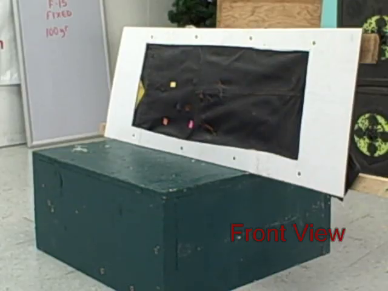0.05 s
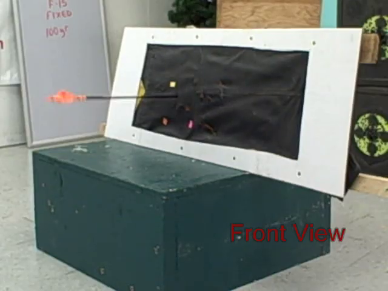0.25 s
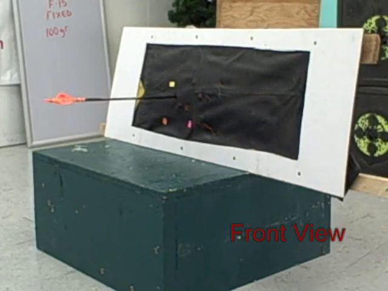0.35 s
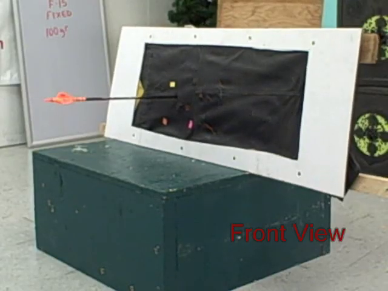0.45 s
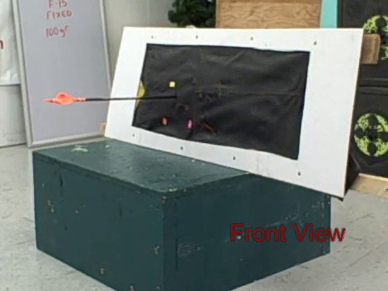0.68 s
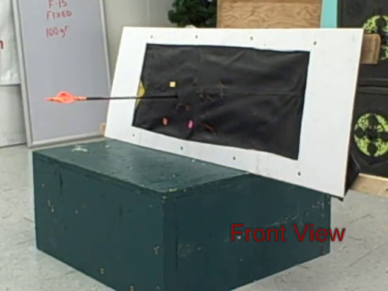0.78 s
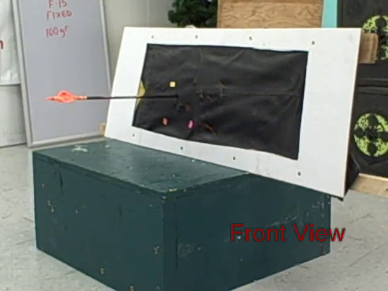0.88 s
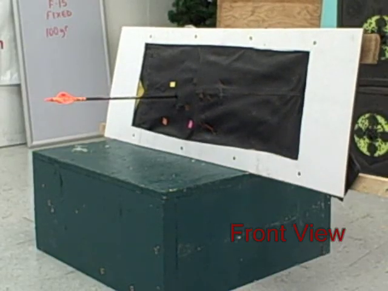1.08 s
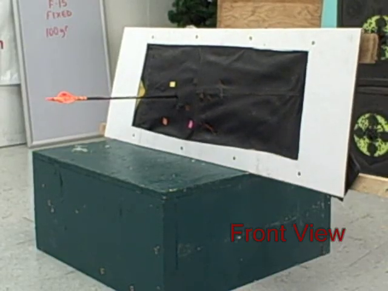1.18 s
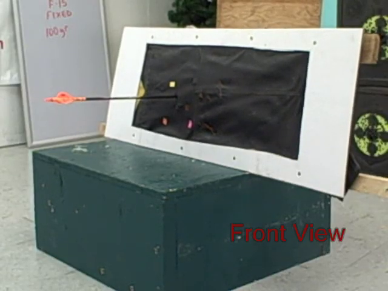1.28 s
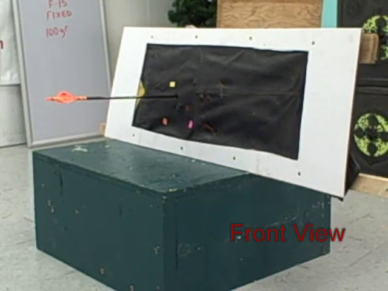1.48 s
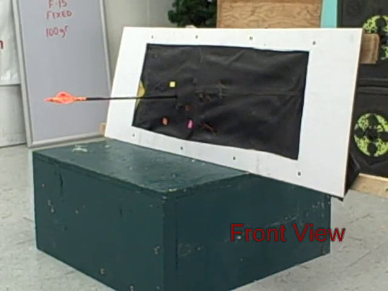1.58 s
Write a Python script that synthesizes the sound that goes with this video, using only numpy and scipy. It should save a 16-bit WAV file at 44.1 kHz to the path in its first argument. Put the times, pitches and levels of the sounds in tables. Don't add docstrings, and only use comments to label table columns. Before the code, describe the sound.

Loud arrow strike on a sheet-covered gel target, heard close in a humming workshop: distant bow release, quick rushing hiss, clipped crack and wooden knocks, echoing boom, then tiny crumb ticks and faint rustling.

```python
import sys
import numpy as np
from scipy import signal
from scipy.fft import rfft, irfft
from scipy.io import wavfile
from scipy.ndimage import uniform_filter1d

SR = 44100
rng = np.random.default_rng(int(sys.argv[2]) if len(sys.argv) > 2 else 0)


def file_out(sig):
    cols = np.atleast_2d(sig).T
    lim = np.clip(cols, -1, 1)
    pcm = np.round(lim * 32767).astype(np.int16)
    wavfile.write(sys.argv[1], SR, pcm)


def elevation(decibels):
    levels = np.asarray(decibels, float)
    return 10 ** (levels / 20)


N = 72765
TIME = np.arange(N) / SR
STRING_S = .0675

# (time [s], level on the board [dB], level of the crack [dB])
BLOWS = [
    (0.2366, -10.5, -0.5),
    (0.244, 11.5, -3),
    (0.2525, 6, -1),
    (0.2561, -5, 3.5),
    (0.2622, -6, 0),
    (0.2697, -2.5, -3.5),
    (.2765, -8.5, -8),
    (.2905, -8.5, -12.5),
    (0.296, -7, -14),
    (.307, -15, -14),
]
HIT_S, BOARD_S = BLOWS[0][0], BLOWS[1][0]


def read(points, hz):
    f, value = np.transpose(points)
    return np.interp(np.log(hz + 1), np.log(f + 1), value)


def hiss(colour):
    hz = np.fft.rfftfreq(N, 1 / SR)
    low_cut = np.minimum(hz / colour[0][0], 1) ** 4
    x = irfft(rfft(rng.standard_normal(N)) * elevation(read(colour, hz)) * low_cut, N)
    return x / x.std()


def fuzzy(hz, width_hz):
    f = np.fft.rfftfreq(N, 1 / SR)
    x = irfft(rfft(rng.standard_normal(N)) / (1 + (2 * (f - hz) / width_hz) ** 2), N)
    return x / x.std()


def puff(s, db, hz, width_hz, length_s):
    return elevation(db) * fuzzy(hz, width_hz) * np.exp(-(2 * (TIME - s) / length_s) ** 2)


def ring(modes, spread_db=0.):
    t = np.arange(SR // 2) / SR
    luck = rng.standard_normal(len(modes))
    return sum(elevation(db + spread_db * e - 60 * t / t60) * np.sin(2 * np.pi * hz * t)
               for (hz, db, t60), e in zip(modes, luck))


def snap(t60):
    return rng.standard_normal(2000) * elevation(-60 * np.arange(2000) / SR / t60)


def quiver(modes, start_s, rise_s, steady=0.):
    settle_s, settle_spread_s = .47, .025
    t = np.maximum(TIME - start_s, 0)
    clean = steady * (1 - np.tanh((t + start_s - settle_s) / settle_spread_s)) / np.sqrt(2)
    out = np.zeros(N)
    for hz, width_hz, db, t60 in modes:
        tone = np.sin(2 * np.pi * (hz * t + rng.random()))
        out += elevation(db - 60 * t / t60) * (clean * tone + (1 - steady) * fuzzy(hz, width_hz))
    return np.minimum(t / rise_s, 1) * out


def add(mix, s, sound):
    part = mix[round(s * SR):][:len(sound)]
    part += sound[:len(part)]


def tail(tone):
    # (frequency [Hz], t60 [s])
    shop_t60 = [(100, .45), (300, .76), (560, .84), (1000, .5), (2000, .54), (4000, .48), (8000, .33),
                (12000, .25)]
    delay_s = .0015
    hz, t, z = signal.stft(rng.standard_normal(3 * SR // 2), SR, nperseg=512, noverlap=384)
    level_db = read(tone, hz)[:, None] - 60 * t / read(shop_t60, hz)[:, None]
    x = signal.istft(z * elevation(level_db), SR, nperseg=512, noverlap=384)[1]
    return x / x[:1000].std() * np.minimum(np.arange(len(x)) / SR / delay_s, 1) ** 2


def shop(x):
    answer = tail([(100, 0.0013), (12000, 0)])
    return signal.fftconvolve(x, answer / np.linalg.norm(answer))[:N]


def air():
    # (frequency [Hz], level [dB per Hz])
    air_colour = [(76, -33.5), (130, -3), (296, -5.5), (443, -16), (613, -19), (882, -20.5), (952, -25.5),
                  (12600, -35.5), (16400, -65), (22000, -120)]
    # (frequency [Hz], width [Hz], level [dB])
    drones = [(32.73, 17, -49.5), (58, 31, -54.5), (80, 14, -53), (95, 9, -53.5), (74, 130, -57)]
    t = TIME - HIT_S
    duck_db = -3 * (t > 0) * np.exp(-(t / .25 / 2) ** 2)
    throb = 1 + .5 * np.cos(2 * np.pi * 3.2 * t + 0.7)
    hum = elevation(-46) * throb * np.sin(2 * np.pi * 93.6 * t)
    rumble = sum(elevation(db) * fuzzy(hz, width_hz) for hz, width_hz, db in drones)
    return hum + elevation(-59.5 + duck_db) * hiss(air_colour) + rumble


def rustle():
    # (time [s], level [dB], frequency [Hz], length [s])
    puffs = [
        (.728, -53, 9220, .022),
        (0.751, -63.5, 8950, .03),
        (0.798, -72, 9590, 0.035),
        (0.922, -65.5, 9030, 0.033),
        (1.101, -70.5, 9095, .025),
        (1.197, -72.5, 9030, 0.039),
        (0.727, -63, 1897, 0.024),
    ]
    return sum(puff(s, db, hz, 0.51 * hz, length_s) for s, db, hz, length_s in puffs)


def crumbs():
    # (time [s], level [dB], frequency [Hz])
    landings = [
        (0.7176, -46, 6060),
        (0.72, -42, 7500),
        (0.7251, -39, 10510),
        (0.7283, -45.5, 9547),
        (0.7316, -35, 10100),
        (0.7356, -49, 6000),
        (.915, -57.5, 8950),
        (0.9218, -43.5, 8690),
        (0.935, -50, 9040),
        (1.169, -56, 10910),
                (.887, -48, 1800),
        (.978, -58, 7000),
        (1.005, -49, 1800),
        (1.0423, -48, 1800),
        (1.0426, -53, 5500),
    ]
    out = np.zeros(N)
    for s, db, hz in landings:
        band = signal.butter(2, [hz * .5, min(hz * 1.5, 20000)], "band", fs=SR)
        add(out, s, elevation(db) * signal.lfilter(*band, snap(0.008)))
    return out


def string():
    # (frequency [Hz], level [dB], t60 [s])
    tones = [(388, -38, .9), (690, -40, .8)]
    sag_per_s, beat_hz = .55, 14
    t = np.maximum(TIME - STRING_S, 0)
    turns = np.cumsum(1 - sag_per_s * np.minimum(t, .3)) / SR
    throb = np.minimum(t / 0.056, 1) * (1 - 0.55 * np.cos(2 * np.pi * beat_hz * t - 0.2))
    return throb * sum(elevation(db - 60 * t / t60) * np.sin(2 * np.pi * hz * turns) for hz, db, t60 in tones)


def bow():
    # (frequency [Hz], width [Hz], level [dB], t60 [s])
    rattle = [(2200, 290, -47.5, 0.063), (4660, 700, -55.5, 0.086), (3100, 500, -57.5, .05)]
    # (frequency [Hz], level [dB], t60 [s])
    bow_modes = [(344, -63, 0.078), (462, 0.5, 0.044), (670, -25, 0.13), (930, 2, 0.026),
                 (1630, -13, 0.036)]
    # (frequency [Hz], width [Hz], level [dB], t60 [s])
    limbs = [(810, 69, -52, 0.44), (1160, 80, -50, 0.51), (310, 110, -45.5, 0.98)]
    # (time [s], level [dB], frequency [Hz], length [s])
    fittings = [
        (.075, -53.5, 4900, 0.02),
        (0.092, -48, 4400, 0.014),
        (.118, -43, 5500, 0.01),
        (0.127, -42, 4750, 0.019),
    ]
    # (frequency [Hz], level [dB])
    bow_echo = [(100, -17), (350, -1), (700, -8), (1500, -10), (3000, -15.5), (5000, -13.5), (8000, -25),
                (12000, -26)]
    trigger_s = .045
    out = quiver(limbs, STRING_S, 0.013) + quiver(rattle, trigger_s, .001)
    add(out, trigger_s, elevation(-51) * snap(0.098))
    add(out, STRING_S, elevation(-32.5) * ring(bow_modes))
    add(out, STRING_S, elevation(-39) * signal.lfilter([.4], [1, -.6], snap(.04)))
    add(out, STRING_S, elevation(-36.5) * tail(bow_echo))
    return out + sum(puff(s, db, hz, 1300, length_s) for s, db, hz, length_s in fittings)


def flight():
    # (time [s], level [dB])
    approach = [
        (0.064, -65),
        (.07, -56),
        (.12, -47),
        (0.164, -41.5),
        (.2, -33.5),
        (.205, -27.5),
        (.222, -23.5),
        (.236, -26),
        (.25, -44),
    ]
    # (frequency [Hz], level [dB per Hz])
    vanes = [(300, -21.5), (1000, -9.5), (2000, -5.5), (3150, -4), (6500, -3), (10100, -2.5), (12600, -1),
             (16400, -31), (22000, -120)]
    s, db = np.transpose(approach)
    flutter = uniform_filter1d(uniform_filter1d(rng.standard_normal(N), size=90), size=90)
    flutter_db = 1.2 * flutter / flutter.std()
    return hiss(vanes) * elevation(np.interp(TIME, s, db, -140, -140) + flutter_db)


def boom():
    # (frequency [Hz], width [Hz], level [dB], t60 [s])
    stand = [(174.93, 16, -18.5, 0.85), (258.4, 30, -25, 0.43), (298.2, 28, -25.5, .6),
             (340.4, 26, -19.5, 0.82), (376.3, 31, -26, .7), (404, 24, -23.5, .75), (450, 30, -18.5, 0.75),
             (559, 30, -18.5, 0.68), (605.5, 30, -29, 0.54), (807, 20, -23.5, .45), (898, 33, -28.5, 0.33),
             (1060, 35, -28.5, .35), (1173, 35, -26.5, .35), (1278, 43, -29.5, 0.41)]
    rock_s, rock_db, rock_spread_s, steady = .44, 6, .035, .42
    rock = elevation(rock_db * np.exp(-((TIME - rock_s) / rock_spread_s) ** 2))
    still = quiver(stand[:2] + stand[9:], BOARD_S, .015, steady)
    rocking = rock * quiver(stand[2:9], BOARD_S, 0.034, steady)
    return elevation(2) * (still + rocking)


def crunch():
    # (frequency [Hz], level [dB per Hz])
    tearing = [(350, -20), (600, -4.5), (656, -12), (1600, -6.5), (1770, -15.5), (2770, -14),
               (12600, -26.5), (16400, -59.5), (22000, -120)]
    hold_s, t60 = 0.024, .1
    t = TIME - HIT_S
    fade_db = -60 * np.maximum(t - hold_s, 0) / t60
    return hiss(tearing) * elevation(-2.5 + fade_db) * np.clip(t / 0.024, 0, 1)


def strike():
    # (frequency [Hz], level [dB], t60 [s])
    tip = [(3935, 3.5, 0.0053), (3120, -7, 0.0075), (5470, -4.5, 0.0051), (8300, -9, 0.0066),
           (895, -9.5, .015), (1255.5, -9.5, .012), (2000, -7, 0.013)]
    # (frequency [Hz], level [dB], t60 [s])
    board = [(172, -9.5, 0.08), (236, 1.5, 0.059), (300, 1, 0.052), (350.2, 3, 0.063), (437, -8, 0.06),
             (536.9, 8.5, 0.0602), (694, -6.5, 0.035), (901, -5.5, 0.11), (985, -3.5, .05),
             (1085, -9.5, 0.07), (1172, -7.5, 0.098), (1287, -7, .05), (1327, -11, 0.094),
             (1610, -8, 0.098)]
    # (frequency [Hz], level [dB])
    hit_echo = [(130, -27.5), (200, -5), (580, -8.5), (660, -16.5), (1300, -10.5), (1700, -23.5),
                (4000, -28.5), (12000, -26.5)]
    out = np.zeros(N)
    add(out, HIT_S, elevation(8) * ring(tip))
    for s, board_db, crack_db in BLOWS:
        add(out, s, elevation(board_db - 13.5) * ring(board, 2.0))
        add(out, s, elevation(crack_db - 11.5) * snap(0.0028))
    add(out, HIT_S, elevation(-11) * tail(hit_echo))
    return signal.sosfilt(signal.butter(3, 135, "high", fs=SR, output="sos"), out)


def scene():
    arrow, ticks = flight(), crumbs()
    echoes = shop(elevation(-11) * arrow + elevation(-22) * ticks)
    impact = strike() + crunch() + boom()
    return (air() + rustle() + ticks + string() + bow() + arrow + impact + echoes)[None]


def band_limit(x):
    return signal.sosfilt(signal.butter(12, 12780, fs=SR, output="sos"), x)


def record(dry):
    cut = signal.lfilter(*signal.butter(1, 20, "high", fs=SR), np.clip(dry, -1, 1))
    edge = signal.firwin(1001, 12950, window=("kaiser", 9), fs=SR)[None]
    limited = signal.oaconvolve(cut, edge, "same")
    leak = .3 * np.clip(10 * (uniform_filter1d(abs(cut), size=100) - .3), 0, 1)
    mix = np.clip(1.07 * (limited + leak * (cut - limited)), -1, 1)
    return band_limit(mix)


dry = scene()
out = record(dry)
file_out(out)
```